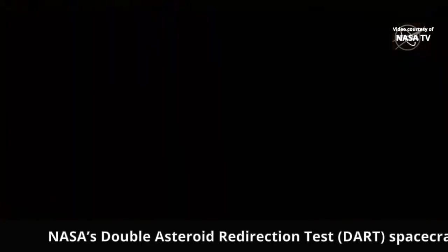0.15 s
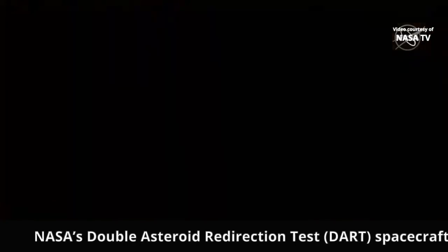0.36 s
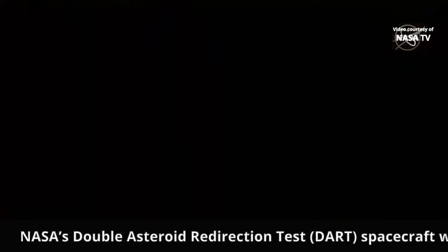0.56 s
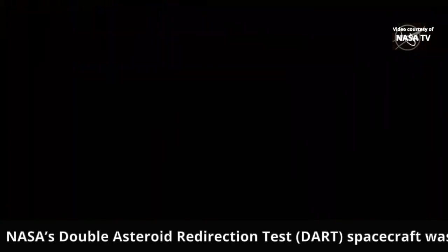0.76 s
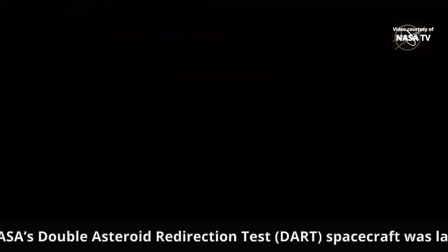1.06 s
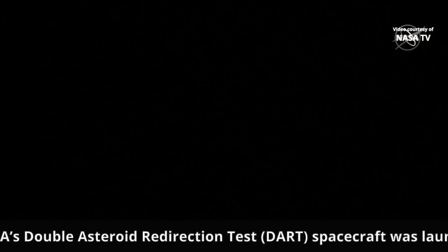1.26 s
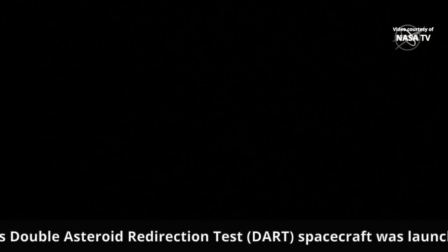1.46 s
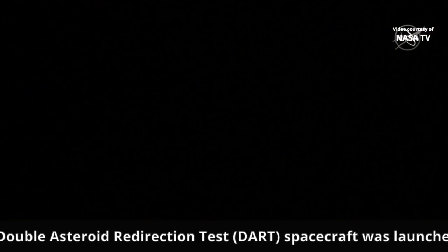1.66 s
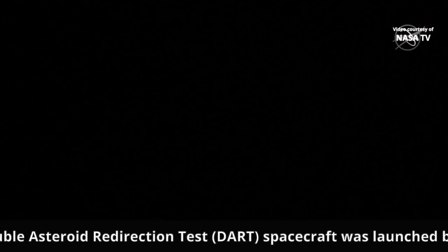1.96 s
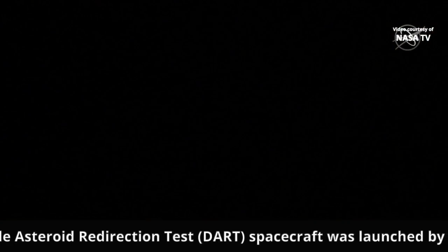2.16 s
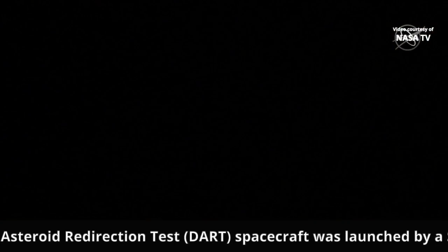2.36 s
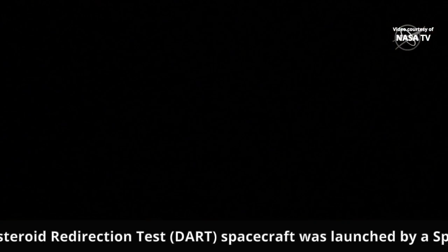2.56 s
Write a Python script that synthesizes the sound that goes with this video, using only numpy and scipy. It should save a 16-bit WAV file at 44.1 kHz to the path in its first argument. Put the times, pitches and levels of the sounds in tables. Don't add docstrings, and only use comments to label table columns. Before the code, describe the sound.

Rocket launch roar from afar at night, deep distorted rumble with rapid fluttering crackle, fading unevenly

```python
import sys
import numpy as np
from scipy import signal
from scipy.fft import rfft, irfft
from scipy.io import wavfile
from scipy.ndimage import uniform_filter1d, map_coordinates

SR = 44100
rng = np.random.default_rng(int(sys.argv[2]) if len(sys.argv) > 2 else 0)


def voltage_ratio(level):
    return 10 ** (np.asarray(level, float) / 20)


def log_audio(samples):
    frames = np.atleast_2d(samples).T
    limited = np.clip(frames, -1, 1)
    pcm = np.round(limited * 32767).astype(np.int16)
    wavfile.write(sys.argv[1], SR, pcm)


N = 119070
LEAD = 8820
T = np.arange(-LEAD, N) / SR

# pitch_hz, level_db
WHINE = [(1333.3, -79), (2666.7, -80), (3333.3, -97), (4000, -94)]
# start_s, length_s, level_db, start_pitch_hz, end_pitch_hz
WHISTLES = [(-.02, .055, -53, 2830, 2830), (.034, .018, -49, 2830, 2815), (.072, .026, -53, 2820, 2815),
            (.109, .013, -52, 2815, 2805), (.13, .028, -57, 2805, 2780), (.164, .03, -59, 2700, 2600),
            (.045, .045, -56, 1290, 1230), (.125, .06, -56, 1270, 1260), (.658, .05, -46, 2735, 2740),
            (.706, .017, -39, 2745, 2735), (.73, .022, -41, 2720, 2700), (.789, .04, -46, 2660, 2610),
            (.838, .055, -51, 2610, 2520), (2.198, .018, -54, 2860, 2850), (2.324, .008, -38, 1180, 1130)]
# pitch_hz, level_db
ROAR_TONE = [(200, 0), (800, -9.5), (1600, -14.5), (3000, -18), (5000, -19.5), (6000, -27), (7200, -40),
             (11000, -71)]
# pitch_hz, width_hz, gain_db
GROUND_HUMPS = [
    (1158, 250, 10.7),
    (2270, 550, 8.5),
]
# time_s, level_db
ROAR_LEVEL = [
    (0, -52),
    (.17, -49.5),
    (.3, -39.5),
    (.6, -40.5),
    (1.0, -53.5),
    (1.5, -50.5),
    (1.9, -46.5),
    (2.7, -50),
]
# start_s, length_s, level_db
CRACKS = [(.201, .002, -44), (.2085, .004, -37), (.216, .008, -46), (.2325, .004, -47), (.245, .003, -42),
          (.253, .003, -44), (.262, .003, -41), (.271, .008, -40), (.289, .003, -46), (.308, .004, -46),
          (.316, .005, -46), (.333, .010, -44), (.358, .022, -42), (.40, .002, -45), (.444, .004, -44),
          (.465, .006, -42), (.481, .012, -43), (.525, .008, -43), (.586, .010, -43), (1.668, .004, -46),
          (2.33, .004, -48)]
# time_s, level_db
RUMBLE_LEVEL = [(0.0, -35.5), (0.18, -34.5), (0.35, -20.5), (0.53, -15.5), (0.68, -32), (0.94, -27),
                (1.15, -26.5), (1.38, -37), (1.59, -39), (1.65, -30), (1.76, -25), (1.8, -27), (2.16, -31),
                (2.21, -39.5), (2.33, -26), (2.45, -28), (2.55, -38.5), (2.7, -33)]
# start_s, length_s, push (1 reaches the upper stop), edge_s
SHOVES = [(-.19, .219, 1.6, .006), (-.005, .0062, -3, 0.005), (0.084, .016, -.6, 0.010),
          (0.101, 0.014, .8, 0.010), (0.193, .014, 1.6, 0.003), (.208, .006, -2.5, .002),
          (0.226, 0.012, 1.5, 0.003), (0.239, 0.004, -3, .003), (.251, .025, 1.2, .003),
          (0.277, 0.011, 1.5, 0.004), (.291, 0.008, -1.5, 0.005), (.304, .007, .6, .005),
          (0.320, 0.009, 2, 0.003), (0.335, 0.006, -2, 0.005), (.349, 0.008, 2.5, 0.003),
          (0.379, 0.008, -1.5, 0.006), (.393, .009, 1.5, .004), (.422, .006, -1.5, .004),
          (.430, .008, 1.2, .004), (.502, .012, 1.2, .003), (.533, .007, 1.5, .003),
          (.78, 0.0034, 2, 0.003), (0.897, 0.012, 1.2, 0.02), (0.935, 0.008, -.8, 0.006),
          (.946, .014, .9, .012), (1.03, .015, 1, 0.012), (1.065, 0.015, -.6, 0.01),
          (1.105, 0.038, 1.4, .012), (1.145, .01, -.8, .008), (1.478, 0.028, 1.2, 0.016),
          (1.511, .008, -.7, .007), (1.527, 0.015, 0.6, .015), (1.634, .01, .7, .008),
          (1.755, .009, -1.1, .006), (1.884, .018, 1.2, 0.008), (2.309, 0.006, -1.5, .005),
          (2.317, .006, 1.2, .005), (2.351, 0.012, -1.3, 0.0052), (2.37, .008, 1.3, 0.006),
          (2.402, .004, -1.5, .004), (2.456, .006, .8, .005), (2.499, 0.008, .8, 0.007),
          (2.546, 0.019, 0.44, .02)]
# start_s, length_s, drive_db (0 reaches the upper stop), flutter_hz
BURSTS = [(0.041, 0.02, -17.5, 170.2), (0.158, .025, -9.5, 131), (.195, .007, 2.5, 301),
          (0.210, 0.017, 7.5, 243.6), (.244, .005, -9.5, 603.3), (0.251, .025, 6.5, 240.4),
          (0.287, 0.037, -10, 217.9), (0.329, .008, -5.5, 203.3), (0.355, .023, 9.5, 242),
          (0.381, 0.016, -8.5, 246.2), (.403, 0.019, 3.5, 319), (0.426, .012, -4.5, 299.4),
          (0.436, 0.06, 10, 220.6), (0.514, 0.02208, 4.5, 203.3), (.540, 0.01947, 6, 248.9),
          (0.554, 0.06773, 6.5, 291.6), (0.497, 0.14, -3, 110.6), (0.629, .07, 1.5, 266.5),
          (0.706, 0.038, -7, 241.7), (0.738, .045, -0.5, 242.6), (0.789, 0.0364, -1, 200.4),
          (0.827, .03, -5.5, 231.6), (0.858, 0.1, -11, 139.8), (0.982, .06, -16, 148.9),
          (1.049, 0.048, -11, 169.7), (1.097, .03, -16, 149.1), (1.151, 0.0591, -16, 120.5),
          (1.22, 0.0811, -15, 110.7), (1.297, .065, -14, 125.3), (1.603, .06, -14.5, 109.8),
          (1.663, 0.035, -12, 180.2), (1.701, 0.02515, -3.5, 171), (1.721, 0.0294, 1, 119.8),
          (1.753, 0.0513, -10, 142), (1.80, 0.046, -12.5, 129.6), (1.844, .03, -18, 130.1),
          (1.897, 0.0302, -21, 140.4), (1.921, .12, -8, 168.4), (2.05, 0.10915, -7.5, 129.7),
          (2.169, 0.054, -23, 131.2), (2.228, 0.0738, -20, 150), (2.307, 0.04535, -12.5, 120.4),
          (2.355, .035, -7.5, 150.7), (2.383, 0.035, -8.5, 189.5), (2.428, 0.06134, -18, 99.5),
          (2.589, 0.059, -21.5, 139.4), (2.652, .06, -23.5, 133.2)]
GAIN = [
    (0, -4),
    (.35, -3.5),
    (.75, -5.5),
    (1.2, -4.5),
    (1.7, -4),
    (2.7, -1.5),
]


def rms_one(x):
    return x / np.sqrt(np.mean(x ** 2) + 1e-20)


def curve(rows):
    return np.interp(T, *np.transpose(rows))


def drift(rate_hz):
    memory = np.exp(-2 * np.pi * rate_hz / SR)
    chance = rng.standard_normal(len(T) + SR)
    wander = signal.lfilter([1], [1, -2 * memory, memory * memory], chance)
    return rms_one(wander[SR:])


def gate(start, length, attack, release):
    rising = (T - start) / attack
    falling = (start + length + release - T) / release
    ramp = np.clip(np.minimum(rising, falling), 0, 1)
    return ramp * ramp * (3 - 2 * ramp)


def shaped(gain_at):
    hz = np.arange(len(T) // 2 + 1) * SR / len(T) + 1e-3
    spectrum = rfft(rng.standard_normal(len(T))) * gain_at(hz)
    return rms_one(irfft(spectrum, len(T)))


def idle_channel():
    cut_hz, hiss_db = 5900, -76
    hiss = voltage_ratio(hiss_db) * shaped(lambda hz: 1 / (1 + (hz / cut_hz) ** 40) + .015)
    whine = sum(voltage_ratio(db) * np.sin(2 * np.pi * hz * T) for hz, db in WHINE)
    return hiss + whine


def whistles():
    wobble_hz = 18 * drift(45)
    flicker = voltage_ratio(1.8 * drift(30))
    out = 0
    for start, length, db, from_hz, to_hz in WHISTLES:
        hz = np.interp(T, [start, start + length], [from_hz, to_hz]) + wobble_hz
        tone = np.sin(2 * np.pi * np.cumsum(hz) / SR)
        out = out + voltage_ratio(db) * gate(start, length, 0.0033, 0.012) * tone
    return out * flicker


def far_roar():
    tone_hz, tone_db = np.transpose(ROAR_TONE)

    def colour(hz):
        slope_db = np.interp(np.log(hz), np.log(tone_hz), tone_db)
        humps_db = sum(db * np.exp(-((hz - centre) / width) ** 2 * 2) for centre, width, db in GROUND_HUMPS)
        return voltage_ratio(slope_db + humps_db) / (1 + (150 / hz) ** 4)

    noise = shaped(colour)
    flicker_db = 1.0 * drift(4.7)
    return voltage_ratio(curve(ROAR_LEVEL) + flicker_db) * noise


def burst_hiss(eddies):
    low_hz, high_hz, level_db = 4000, 10300, -70
    power = np.minimum(uniform_filter1d(eddies ** 2, size=500), 3.0)
    hiss = shaped(lambda hz: 1 / (1 + low_hz / hz) / (1 + (hz / high_hz) ** 30))
    return voltage_ratio(level_db) * power * hiss


def crackle():
    low_hz, high_hz, edge_s = 1500, 5040, 0.00081
    noise = shaped(lambda hz: 1 / (1 + (low_hz / hz) ** 2) / (1 + (hz / high_hz) ** 7.0))
    return noise * sum(voltage_ratio(db) * gate(start, length, edge_s, edge_s) for start, length, db in CRACKS)


def rumble():
    low_hz, high_hz, drive_db = 20, 61, 21
    noise = shaped(lambda hz: 1 / (1 + (low_hz / hz) ** 2) / (1 + (hz / high_hz) ** 3.47))
    return voltage_ratio(curve(RUMBLE_LEVEL) + drive_db) * noise


def shoves():
    return sum(push * gate(start, length, edge, edge) for start, length, push, edge in SHOVES)


def flutter():
    lull = voltage_ratio(-44)
    size = lull + 0 * T
    speed = 80.06 * lull + 0 * T
    for start, length, db, hz in BURSTS:
        burst = voltage_ratio(db) * gate(start, length, 0.001978 + .15 * length, .003 + .3 * length)
        size = size + burst
        speed = speed + hz * burst

    row_hz, width, steepness = 400, 0.54, 1.72

    def colour(hz):
        ratio = hz / row_hz
        peak = ratio / np.hypot(1 - ratio ** 2, width * ratio)
        return peak / (1 + (ratio / steepness) ** 2)

    row = shaped(colour)
    evenness = .8
    row = rms_one(row / (uniform_filter1d(row ** 2, size=220) + .02) ** (evenness / 2))
    wander = np.exp(.15 * drift(30))
    place = np.cumsum(speed / size * wander) / row_hz
    lumps = voltage_ratio(1.5 * drift(22.5))
    return size * lumps * map_coordinates(row, [place], order=3, mode="wrap")


def capsule(pressure, faint):
    knee, lower_stop, stop_db, mute_floor_db = 7.1, 1.91, -10, -8.5
    x = pressure + 0.051
    squeeze = 1 + np.abs(x / np.where(x > 0, 1, lower_stop)) ** knee
    wave = voltage_ratio(stop_db) * x * squeeze ** (-1 / knee)
    for edge_hz in (1660, 21000):
        wave = signal.lfilter(*signal.butter(1, edge_hz, fs=SR), wave)
    passing = voltage_ratio(mute_floor_db) + squeeze ** (-1 / knee - 1)
    bass_cut = signal.butter(2, 17, "high", fs=SR, output="sos")
    return signal.sosfilt(bass_cut, wave + passing * faint)


def scene():
    eddies = flutter()
    pressure = rumble() + eddies + shoves()
    faint = far_roar() + whistles() + burst_hiss(eddies) + crackle()
    both = np.array([capsule(pressure, faint), idle_channel()])
    return (both * voltage_ratio(curve(GAIN)))[:, LEAD:]


def low_pass(x):
    return signal.sosfilt(signal.butter(12, 11700, fs=SR, output="sos"), x)


def record(dry):
    return low_pass(dry)


dry = scene()
out = record(dry)
log_audio(out)
```